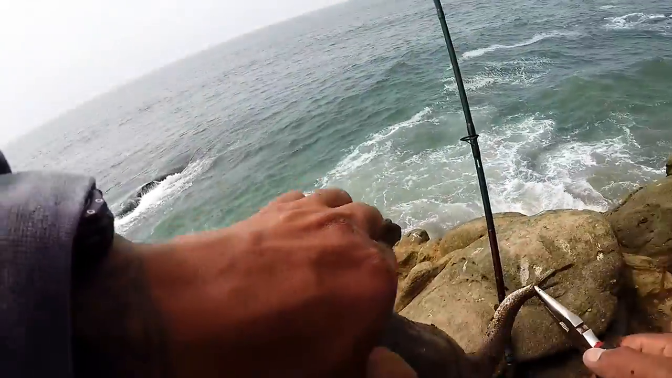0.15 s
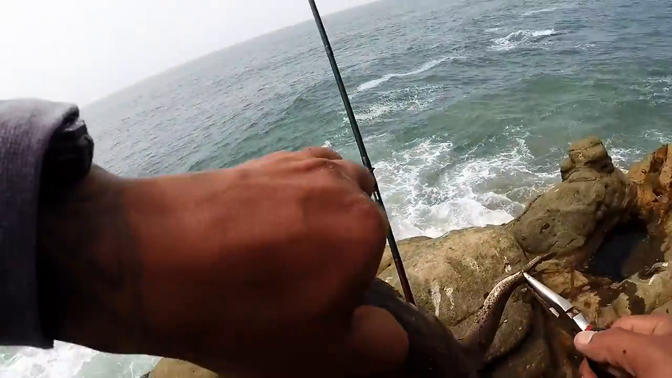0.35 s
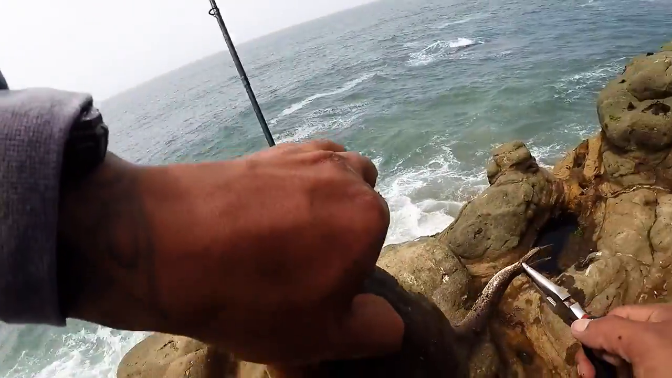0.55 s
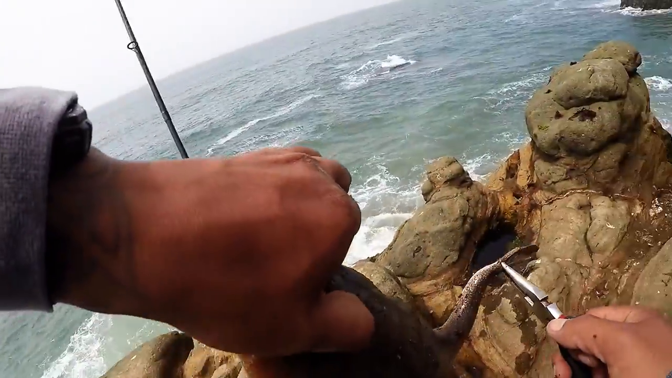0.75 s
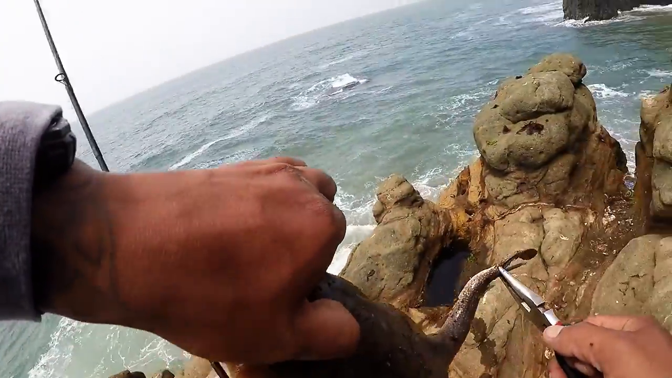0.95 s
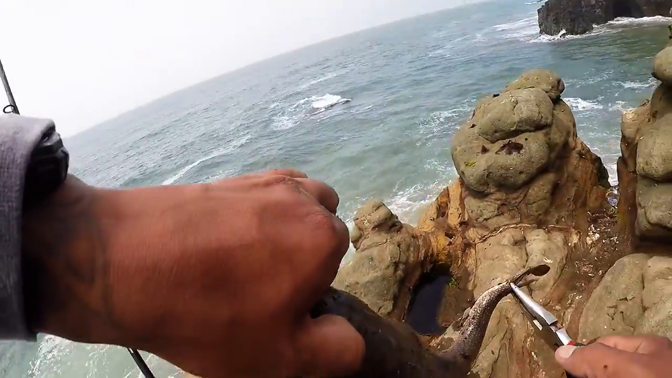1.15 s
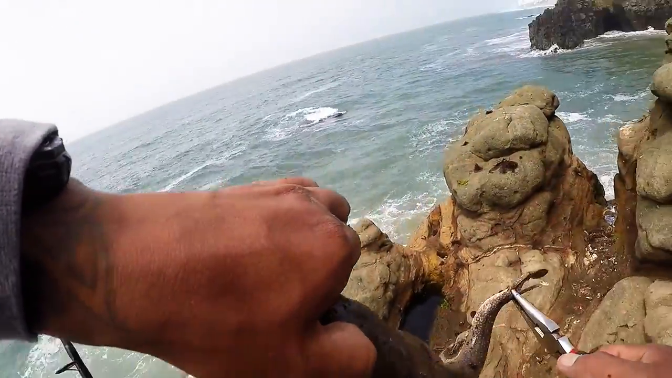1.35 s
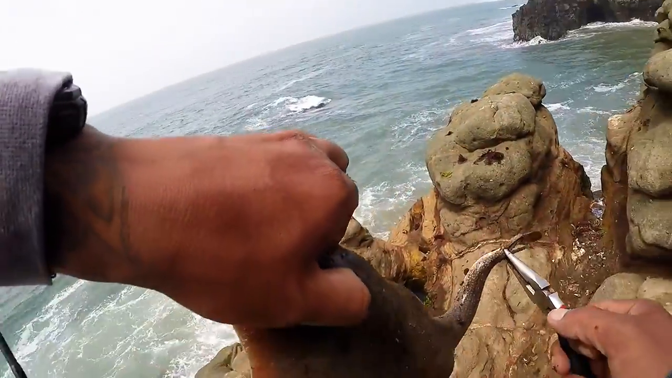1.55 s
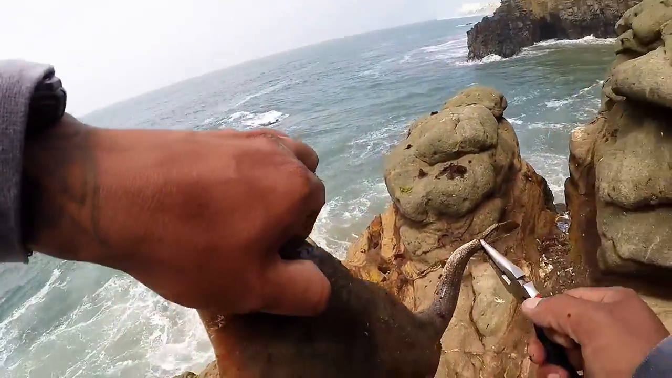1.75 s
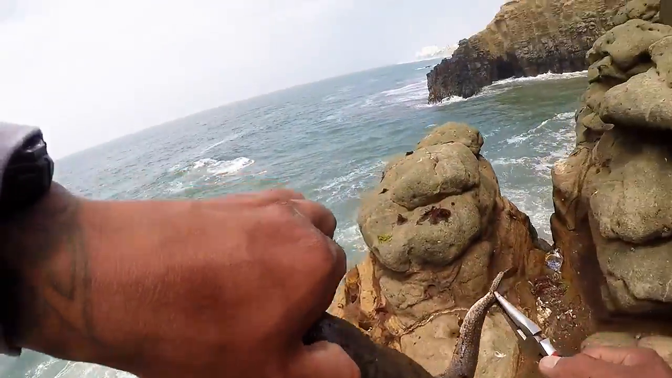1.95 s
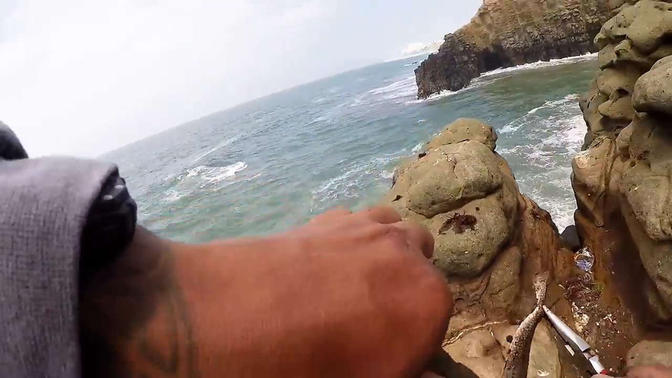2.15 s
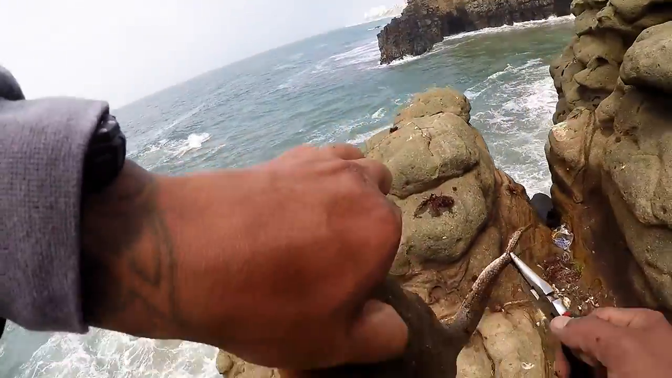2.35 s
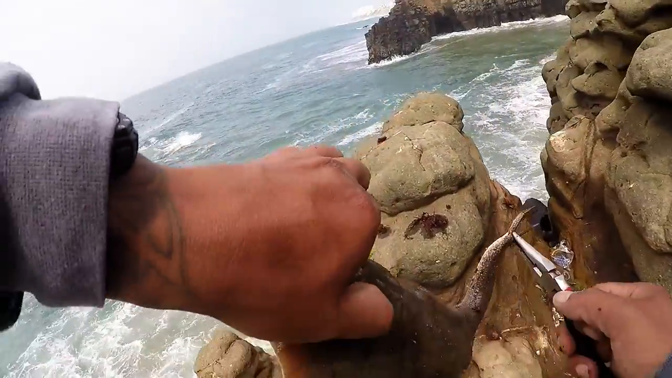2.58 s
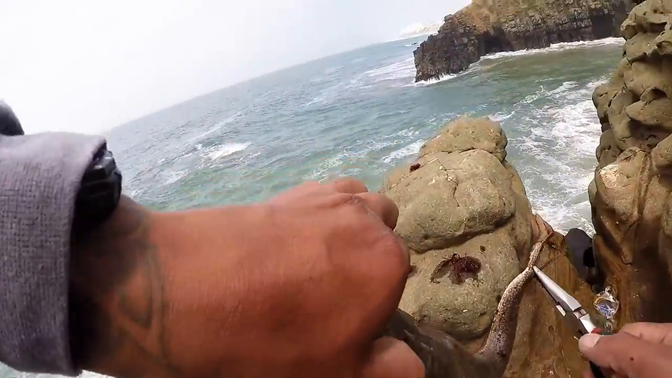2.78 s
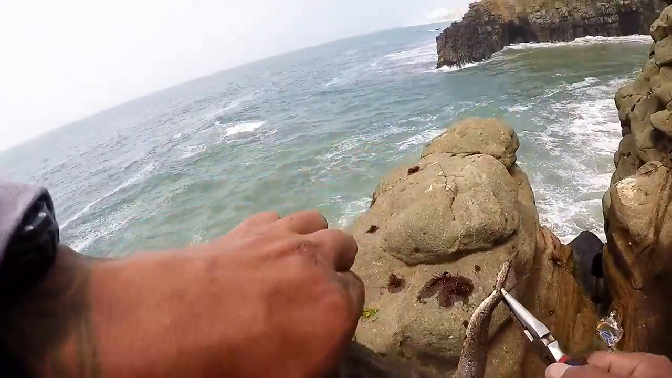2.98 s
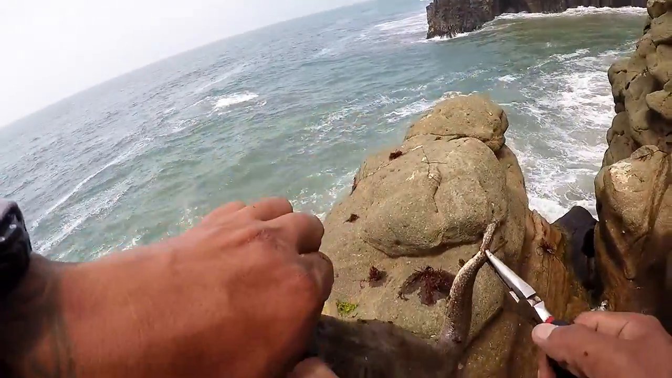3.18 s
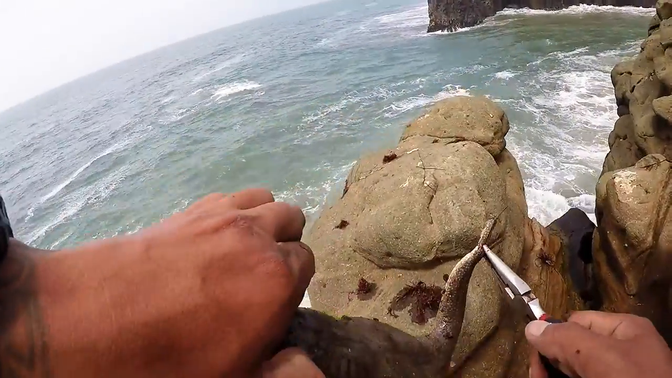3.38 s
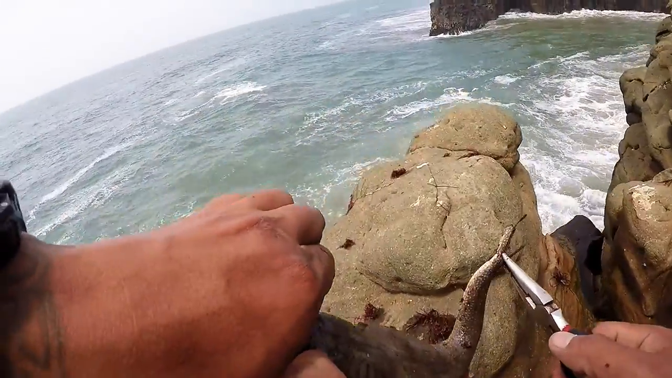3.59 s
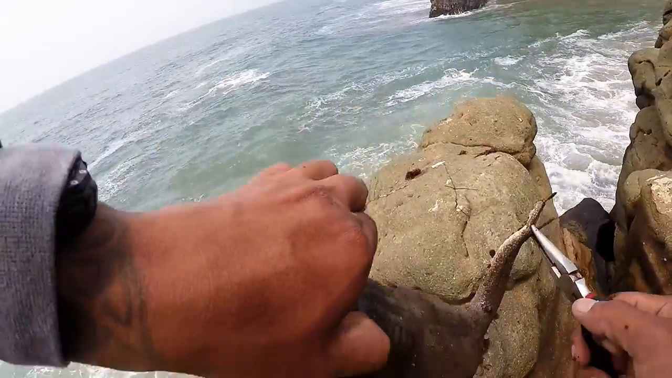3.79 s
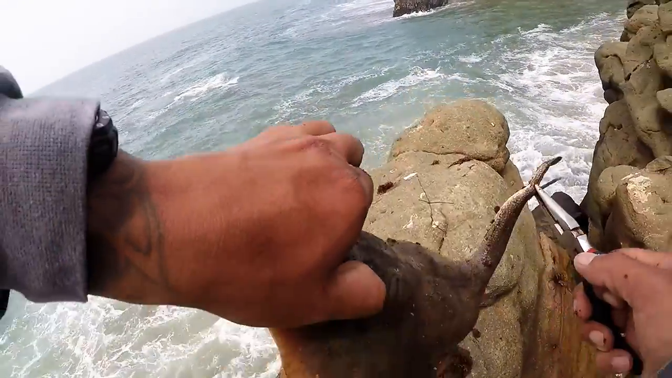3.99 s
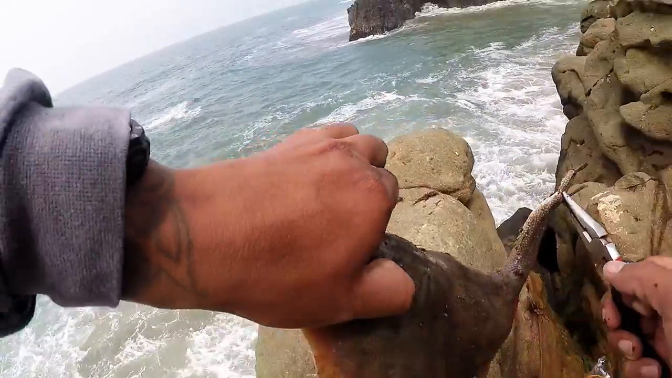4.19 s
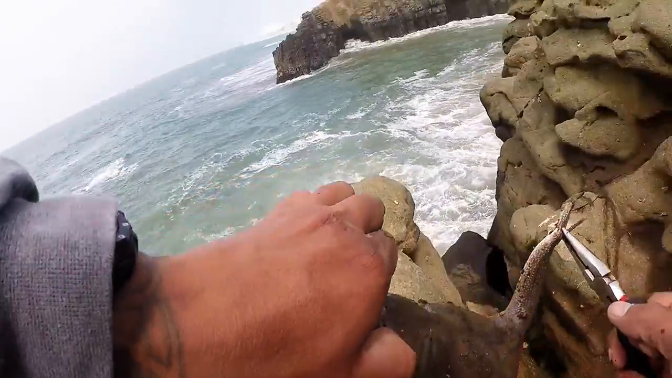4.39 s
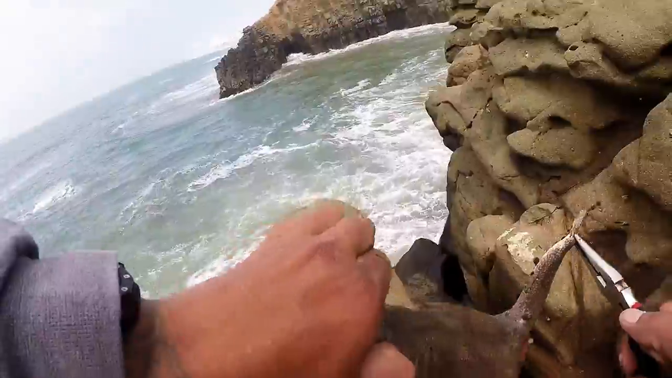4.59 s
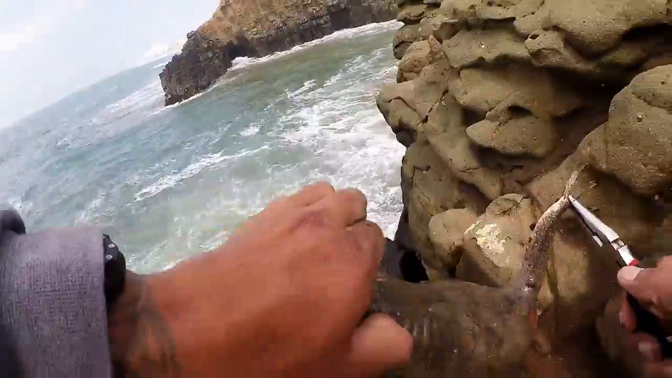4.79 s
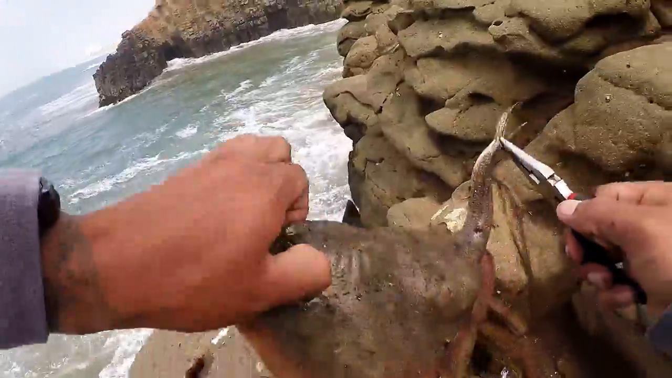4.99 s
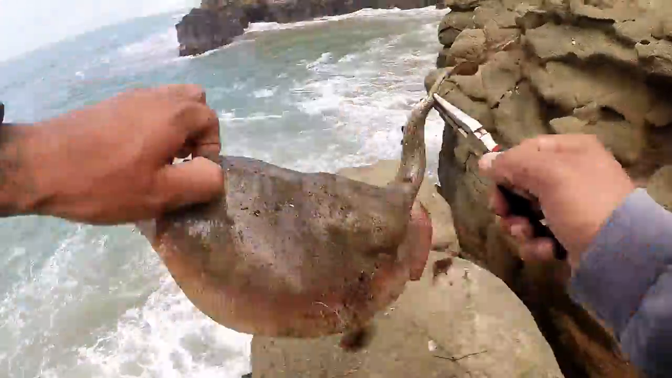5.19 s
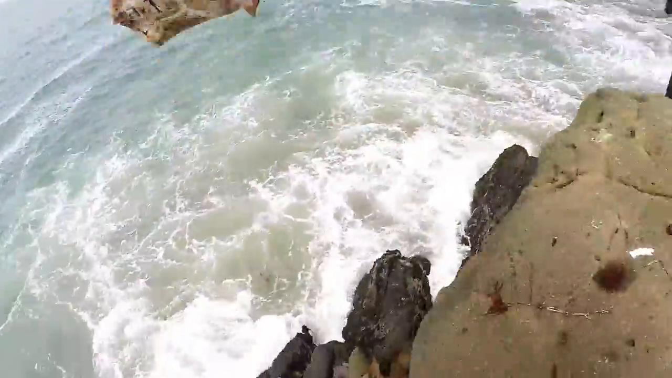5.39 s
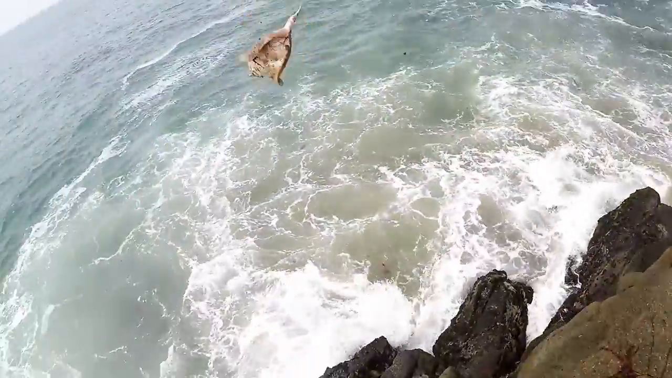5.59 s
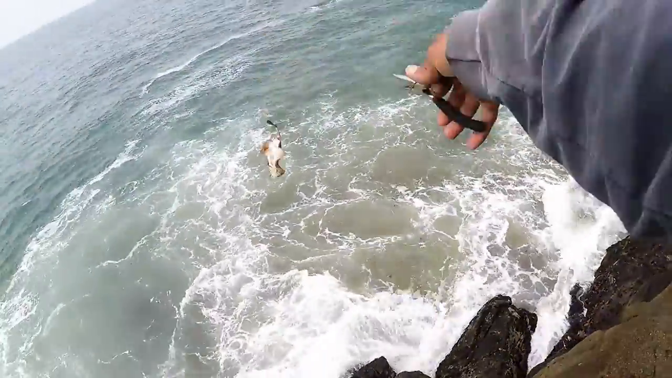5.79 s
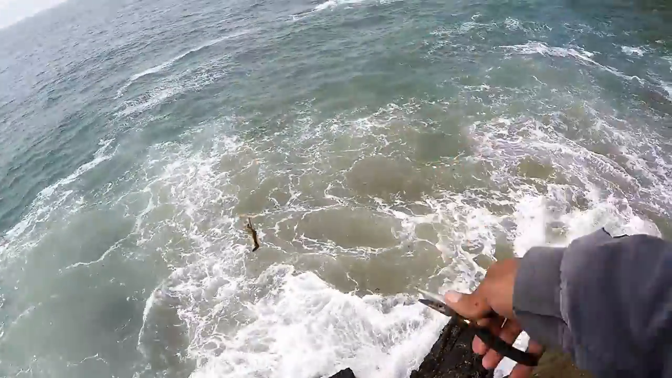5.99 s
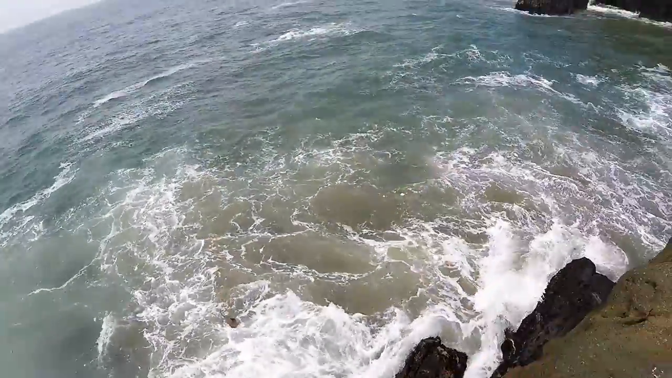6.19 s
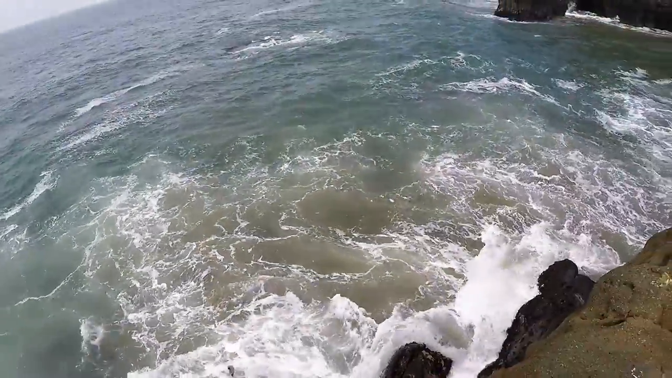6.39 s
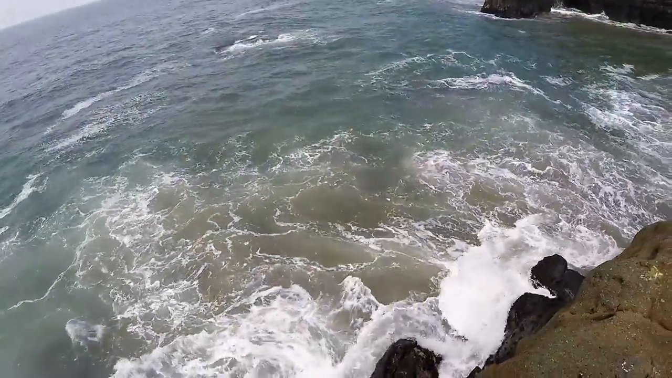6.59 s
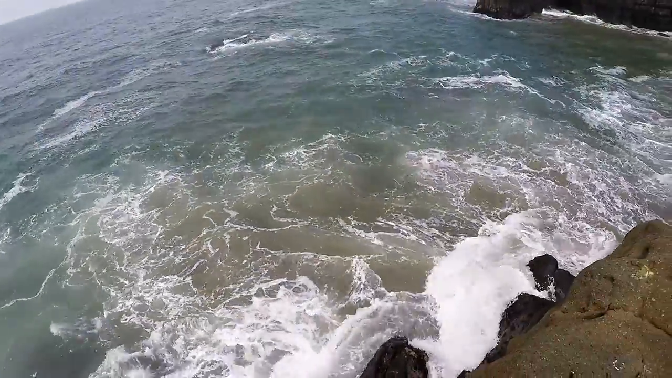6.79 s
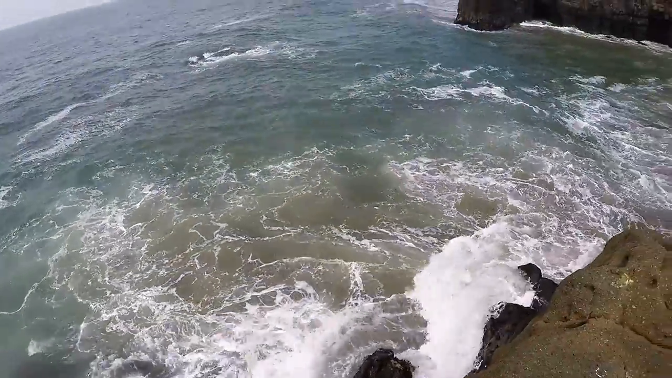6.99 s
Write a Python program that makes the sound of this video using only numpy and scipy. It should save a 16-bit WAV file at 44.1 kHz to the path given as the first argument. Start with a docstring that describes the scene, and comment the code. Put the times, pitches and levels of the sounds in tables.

```python
"""On a rocky shore, surf washes in, drops burst and pools plop below a body-worn camera in a closed housing.
The sea is shaped noise and the plops are ringing bubbles, both coloured by the housing.
Wind thumps and flutters on the microphone port as evened-out low noise and swinging pushes. Clothing rubs
the housing as noise through its shell, hardest when the arms swing out for a throw; small knocks snap
through the mount and ring the shell. The electronics whine faintly as a thin tone."""
import sys
import numpy as np
from scipy import signal
from scipy.fft import rfft, irfft, next_fast_len
from scipy.io import wavfile
from scipy.ndimage import uniform_filter1d, map_coordinates

SR = 44100
rng = np.random.default_rng(int(sys.argv[2]) if len(sys.argv) > 2 else 0)


def transcribe(u):
    """Save the signal u as a 16-bit wav file named by the first command-line argument.

    u: samples, shape (n,) or (channels, n), limited to [-1, 1]; the rate is SR.
    q: integer samples, one column per channel.
    """
    v = np.clip(np.atleast_2d(u).T, -1, 1)
    q = np.round(v * 32767).astype(np.int16)
    wavfile.write(sys.argv[1], SR, q)


N = 310905
TIME = np.arange(N) / SR


def amp(db):
    """Gain of a level in dB."""
    return 10 ** (np.asarray(db) / 20)


def unit(x):
    """x at rms 1."""
    return x / np.sqrt(np.mean(x ** 2) + 1e-20)


def along(points, hz):
    """(Hz, dB) points read on a log frequency axis, -120 dB outside."""
    point_hz, point_db = np.transpose(points)
    return np.interp(np.log(hz + 1), np.log(point_hz + 1), point_db, -120, -120)


def curves(rows):
    """One value per sample for each column after the time, -120 dB outside."""
    knot_s, *columns = np.transpose(rows)
    return [np.interp(TIME, knot_s, column, -120, -120) for column in columns]


def wobble(rate):
    """A smooth random curve, rate knots a second."""
    knots = rng.standard_normal(int(N * rate / SR) + 4)
    return map_coordinates(knots, [TIME * rate])


def filtered(x, response):
    """x times a response of frequency."""
    size = next_fast_len(N + SR // 2)  # zero padding leaves room for ringing
    return irfft(rfft(x, size) * response(np.fft.rfftfreq(size, 1 / SR)), size)[:N]


def bell(peak_s, half_s, db):
    """A smooth rise and fall around peak_s, down to half after half_s."""
    halvings = np.minimum(((TIME - peak_s) / half_s) ** 2, 40)
    return amp(db) * np.exp(-np.log(2) * halvings)


def rush(spectrum, patchy_db):
    """Coloured noise of rms 1 with patches of random gain in time and frequency."""
    bins = signal.stft(rng.standard_normal(N), nperseg=512)[2]
    patches = uniform_filter1d(rng.standard_normal(bins.shape), size=10, axis=0)
    patches = uniform_filter1d(patches, size=10, axis=1)
    noise = signal.istft(bins * amp(patchy_db * unit(patches)), nperseg=512)[1][:N]
    return unit(filtered(noise, lambda hz: amp(along(spectrum, hz))))


def sea():
    """Four noises from far to near, breakers, roar, foam and spray, heave together with the wash."""
    # the wash over time: start_s, roar_db, foam_db, spray_db (before the random heave and fizz)
    wash = [(0.0, -50.5, -56.5, -68), (0.6, -54, -57, -69.5), (1.24, -51.5, -56, -69.5),
            (1.47, -52, -56, -66.5), (1.82, -53, -60, -71), (2.67, -52.5, -56, -69),
            (3.12, -53, -61, -69.5), (3.7, -53.5, -53, -69), (3.9, -54, -57.5, -70.5),
            (4.5, -55, -59, -70.5), (5.14, -57, -60.5, -72), (5.3, -49.5, -53, -65),
            (5.48, -51.5, -51.5, -64.5), (5.79, -50.5, -50, -65.5), (6.03, -47.5, -50.5, -67),
            (6.32, -47.5, -49, -65.5), (6.7, -48.5, -47, -63.5), (7.05, -45.5, -45, -62)]
    # noise colours, far to near: pitch_hz, relative_db per Hz
    breakers_colour = [(100, -29), (200, 1), (400, -1.5), (700, -3.5), (1100, -6.5), (1600, -31),
                       (2500, -27)]
    roar_colour = [(500, -14), (1000, -7.5), (1500, 1), (2500, 0), (3700, -6), (5000, -45), (8000, -32)]
    foam_colour = [(1200, -39), (2500, -16), (3600, 0), (4900, -1), (5700, -6.5), (6800, -12), (8000, -14),
                   (10000, -32.5)]
    spray_colour = [(5000, -22), (8000, -12), (10000, -1.5), (12000, -3.5), (15500, -10.5)]

    roar_db, foam_db, spray_db = curves(wash)
    # the far rumble averages -54 dB and swings a little less than the roar
    breakers_db = -54 + 0.86 * (roar_db - roar_db.mean())
    heave_db = 0.34 * wobble(3.5) + 0.24 * wobble(14)
    # bursting bubbles come in flurries
    fizz_db = 0.59 * heave_db + 0.57 * wobble(18) + 0.4 * wobble(40)

    breakers = amp(breakers_db + 0.11 * heave_db) * rush(breakers_colour, patchy_db=1.24)
    roar = amp(roar_db + heave_db) * rush(roar_colour, patchy_db=0.94)
    foam = amp(foam_db + fizz_db) * rush(foam_colour, patchy_db=1.0)
    spray = amp(spray_db + fizz_db) * rush(spray_colour, patchy_db=0.5)
    return breakers + roar + foam + spray


def eddies(spectrum, even, top_hz):
    """Low noise whose swings are evened out: eddies pass one after another, each of about the gust's strength."""
    noise = rush(spectrum, patchy_db=-1.5)
    envelope = np.abs(signal.hilbert(noise, next_fast_len(N))[:N])
    swing = uniform_filter1d(envelope, size=SR // 60)
    evened = noise / (swing + 0.37) ** even
    return unit(filtered(evened, lambda hz: 1 / (1 + (hz / top_hz) ** 6)))


def wind():
    """Large eddies thump, small ones flutter; a strong puff swings the capsule briefly and stirs up the flutter."""
    # changing draught on the port: start_s, thump_db (slow), flutter_db (fast), before random gusting
    draught = [(0.0, -40, -48.5), (0.72, -45, -55.5), (1.08, -37, -50), (1.55, -42.5, -50.5),
               (2.1, -36.5, -54), (2.32, -42.5, -51.5), (4.34, -41.5, -53), (5.06, -34, -48),
               (5.3, -29, -36), (5.67, -35.5, -51), (6.07, -43, -43.5), (7.05, -38, -50.5)]
    # colours of large and small eddies: pitch_hz, relative_db per Hz
    thump_colour = [(4.7, -4), (8.0, 3), (31, 0.5), (41, -3.5), (70, -9), (91, 5.5), (150, -120)]
    flutter_colour = [(26, -36), (45, 3.5), (102, -8), (140, -11), (178, -17.5), (248, -31), (300, -20.5),
                      (390, -28), (660, -120)]
    # single puffs pushing the capsule: peak_s, push_db (peak of the swell), swing_hz, half_s (time from
    # the peak to half the push), flutter_db (stirred up at the peak, before random gusting)
    puff_rows = [(0.222, -27, 36, 0.02, -47), (0.479, -29, 32, .015, -53), (0.609, -32, 31, 0.023, -57),
                 (0.669, -31, 21.4, 0.033, -60), (.846, -29, 25, 0.018, -42.5),
                 (0.987, -24, 21, 0.023, -54), (1.089, -32, 27, .025, -48), (1.18, -21.5, 24, 0.031, -51),
                 (1.338, -30, 20, .016, -46), (1.465, -21, 27, 0.018, -41.5),
                 (1.694, -28.5, 24, 0.016, -57), (1.974, -27, 31.4, 0.047, -51),
                 (2.072, -18.5, 20, 0.019, -45), (2.191, -27, 16, 0.033, -49), (2.296, -27.5, 20, .02, -54),
                 (2.671, -27, 17, 0.034, -48), (2.821, -26, 26, .04, -51), (2.899, -28.5, 33.6, 0.028, -43),
                 (2.962, -22, 31.5, 0.016, -45), (3.214, -27.5, 23, .016, -43),
                 (3.489, -27, 20.5, 0.033, -53), (3.749, -27, 25, 0.018, -46),
                 (3.998, -30.5, 30, .015, -52), (4.15, -33, 25, 0.016, -51), (4.3, -32, 34, 0.036, -48),
                 (4.475, -27.5, 27, 0.016, -59), (4.542, -33.5, 30, .04, -49.5),
                 (4.831, -27.5, 38, .015, -44), (5.157, -11.5, 22, 0.025, -43),
                 (5.251, -16, 31, 0.043, -40), (5.415, -21.5, 16.5, 0.024, -25.5),
                 (5.52, -25.5, 22.5, .03, -36), (5.665, -27.5, 23, 0.025, -54),
                 (5.74, -30.5, 34, 0.015, -47), (5.913, -23, 22, 0.021, -41), (6.154, -29, 30, 0.017, -46),
                 (6.417, -23, 41, .015, -42), (6.667, -29, 41, 0.012, -46), (6.942, -26, 48, 0.019, -37)]
    flutter_lasts = 1.63  # times the length of the push

    thump_db, flutter_db = curves(draught)
    pushes, stirred_power = np.zeros(N), np.zeros(N)
    for peak_s, push_db, swing_hz, half_s, stirred_db in puff_rows:
        turns = swing_hz * (TIME - peak_s) + rng.random()
        pushes += bell(peak_s, half_s, push_db) * np.cos(2 * np.pi * turns)
        stirred_power += bell(peak_s, flutter_lasts * half_s, stirred_db) ** 2

    gusting = wobble(13)
    thump = amp(thump_db + 2.0 * gusting) * eddies(thump_colour, even=0.6, top_hz=62.6)
    flutter_level = np.sqrt(amp(flutter_db) ** 2 + stirred_power) * amp(0.88 * gusting)
    flutter = flutter_level * eddies(flutter_colour, even=0.56, top_hz=320)
    return thump + pushes + flutter


def whine():
    """A thin tone of the circuit, steady in level, its phase wandering a little."""
    # circuit tones: pitch_hz, level_db (rms)
    tones = [(8631, -75)]
    return sum(amp(db) * np.sqrt(2) * np.sin(2 * np.pi * hz * TIME + 1.2 * wobble(9.1)) for hz, db in tones)


def shell(f):
    """Response of the shell to a force; the sound crosses mount and wall, so each resonance acts twice."""
    # resonances of the housing shell: pitch_hz, width_hz, level_db (for one crossing)
    resonances = [(141, 54, 3.5), (570, 374, 0), (995, 360, 4), (1910, 770, -0.5), (2404, 334, 3.5),
                  (2780, 540, -0.5), (4070, 1050, -2.5), (6600, 1900, -9)]
    crossing = 0
    for k, (centre_hz, width_hz, db) in enumerate(resonances):
        damping = 1j * f * width_hz
        # neighbouring resonances alternate in sign
        crossing = crossing + (-1) ** k * amp(db) * damping / (centre_hz ** 2 - f * f + damping)
    return crossing ** 2


def stroke(start_s, length_s, db, swell_db):
    """Level of one stroke in dB: it catches, swells evenly and lets go."""
    catch_s, let_go_s = 0.0068, 0.0079  # time to gain or lose 10 dB at the ends
    t = TIME - start_s
    ends = np.maximum(-t, 0) / catch_s + np.maximum(t - length_s, 0) / let_go_s
    return np.maximum(db + swell_db * np.clip(t / length_s, 0, 1) - 10 * ends, -120)


def rubbing():
    """Fibres catch and slip in clumps; the harder the stroke, the more it reaches the higher resonances."""
    # strokes of cloth on the housing: start_s, length_s, level_db (at the start), swell_db (over the stroke)
    strokes = [(0.154, .17, -52, -1.5), (1.181, 0.067, -56, -1), (1.271, .025, -49, 0),
               (1.348, .07, -52.5, 6.5), (3.735, .04, -50.5, -1), (4.25, .115, -52, 0.5),
               (5.097, .03, -50, 2), (5.14, .04, -52, 2), (5.22, .08, -53, -7), (5.307, .06, -43, 6.5),
               (5.371, 0.058, -38, -1), (5.428, 0.046, -38.5, 3.5), (5.485, 0.057, -44.5, -1),
               (5.56, 0.275, -51.5, 0.5), (5.852, .05, -51, 11)]
    clumps_db = 1.6 * wobble(90) + 2 * wobble(500)
    slips = unit(filtered(rng.standard_normal(N) * amp(clumps_db), shell))
    dull = filtered(slips, lambda hz: hz < 1400)
    crisp = slips - dull
    level_db = np.max([stroke(*row) for row in strokes], axis=0)
    crisp_db = 0.23 * (level_db + 47.5)
    return amp(level_db) * (dull + amp(crisp_db) * crisp)


def plops():
    """A trapped bubble rings with a soft start and rises in pitch."""
    # bubbles in a rock pool: start_s, level_db (before the soft start), pitch_hz (at the start),
    # t60_s (time to fall 60 dB)
    bubbles = [(0.549, -35.5, 386, 0.073), (2.895, -40.5, 497, 0.07)]
    out, t = np.zeros(N), TIME[:SR // 8]
    for start_s, db, hz, t60_s in bubbles:
        soft_start = 1 - np.exp(-t / .006)
        ring = np.sin(2 * np.pi * hz * t * (1 + 1.2 * t))
        out[round(start_s * SR):][:len(t)] += amp(db - 60 * t / t60_s) * soft_start * ring
    return out


def splashes():
    """Drops burst on near rock, each a brief swell of bright, patchy noise."""
    # bursts: peak_s, level_db (at the peak), length_s (from the peak down to 1/e)
    drops = [(1.39, -63, .04), (2.968, -54, 0.13), (3.765, -54, .05), (5.723, -64, .03),
             (6.573, -46, 0.014), (6.783, -57, 0.025)]
    bursts = sum(amp(db) * np.exp(-((TIME - peak_s) / length_s) ** 2) for peak_s, db, length_s in drops)
    return bursts * rush([(3000, 5.5), (6000, -1.5), (15500, -32)], patchy_db=2.5)  # (Hz, relative dB per Hz)


def knocks():
    """A contact snaps and rattles briefly; the capsule feels it at once and the shell rings after it."""
    # knocks through the mount: centre_s, level_db (of the snap's swell, before the mount), pitch_hz (of the
    # contact), length_ms (from the centre down to 0.61)
    contacts = [(5.108, -44, 580, 2.9), (1.416, -47, 1100, 3.3), (5.127, -52, 4050, 4),
                (5.203, -32.5, 990, 0.21), (5.207, -33.5, 140, 2.2), (5.309, -31, 1800, 0.25),
                (5.466, -34, 1760, 2.5), (5.573, -32, 112, 5.1), (5.86, -31.5, 170, 4.2),
                (5.853, -35, 860, 0.96), (5.858, -37, 1970, 1), (5.8902, -27, 2250, 0.67),
                (5.889, -30.5, 860, 0.9), (5.894, -35, 2940, 1.4), (5.9612, -27.5, 950, 0.68),
                (5.9605, -33.5, 2900, 0.26)]
    crack_db, crack_loss_db_per_ms = -3, 7.5  # rattle over the snap, less for a longer, softer contact
    crack_t60_s = 0.021
    mount_hz = 4200  # the mount passes little above this

    forces, t = np.zeros(N), TIME[:SR // 10] - 1 / 20
    for centre_s, db, hz, length_ms in contacts:
        rough, hiss = rng.standard_normal((2, len(t)))
        swell = np.exp(-.5 * (1000 * t / length_ms) ** 2)
        roughness = 1 + 0.14 * uniform_filter1d(rough, size=9)
        snap = swell * roughness * np.sin(2 * np.pi * hz * t)
        decay_db = -60 * np.abs(t) / crack_t60_s
        crack = (t > 0) * amp(crack_db - crack_loss_db_per_ms * length_ms + decay_db) * hiss
        forces[round(centre_s * SR) - SR // 20:][:len(t)] += amp(db) * (snap + crack)
    forces = filtered(forces, lambda hz: 1 / (1 + (hz / mount_hz) ** 8))
    return forces + amp(-7.5) * filtered(forces, shell)


def housing(hz):
    """Gain of the air path into the microphone: the closed housing lifts some bands and dips others."""
    # peaks and dips: pitch_hz, width_hz (from the centre to 0.61 of the dB), gain_db
    bands = [(642, 25, -3), (940, 85, 1), (1237, 91, -3.5), (1604, 63, 2.5), (1976, 51, -3), (2427, 67, 3),
             (3036, 150, -3.5), (3845, 190, 3), (4860, 600, -2), (5690, 670, -4), (6660, 305, 8),
             (9520, 170, 5), (11500, 1000, -3.5), (13500, 920, 2)]
    return amp(sum(db * np.exp(-.5 * ((hz - centre) / width) ** 2) for centre, width, db in bands))


def scene():
    """Airborne sound passes the housing; wind, touch and whine bypass that colouring."""
    airborne = filtered(sea() + splashes() + plops(), housing)
    return (airborne + wind() + rubbing() + knocks() + whine())[None]


def record(dry):
    """The camera keeps nothing above its band limit of 15.4 kHz."""
    return filtered(dry[0], lambda hz: hz < 15400)[None]


dry = scene()
out = record(dry)
transcribe(out)
```